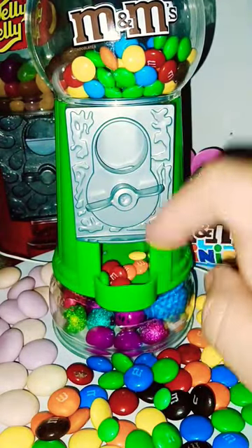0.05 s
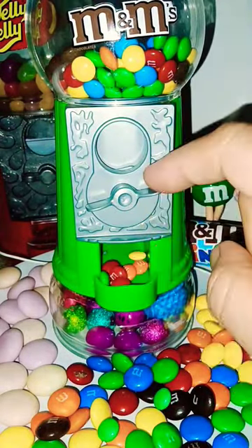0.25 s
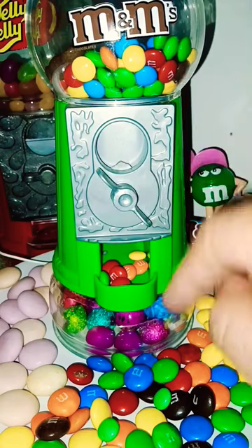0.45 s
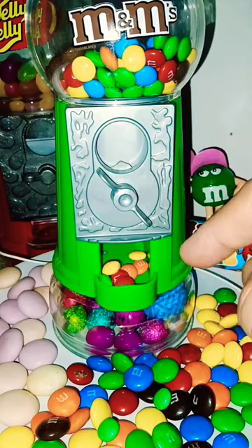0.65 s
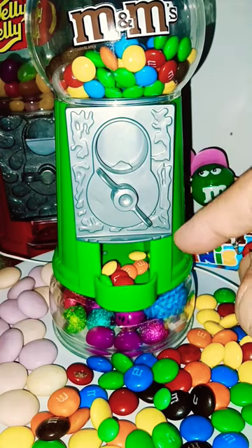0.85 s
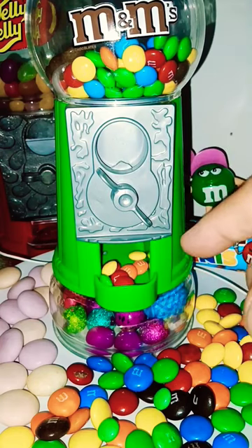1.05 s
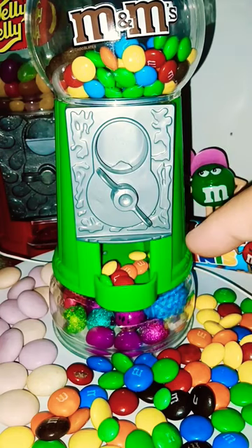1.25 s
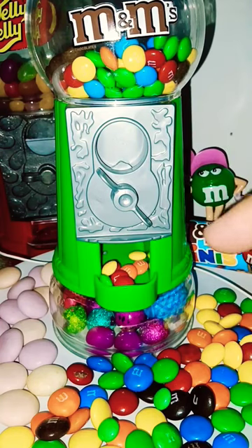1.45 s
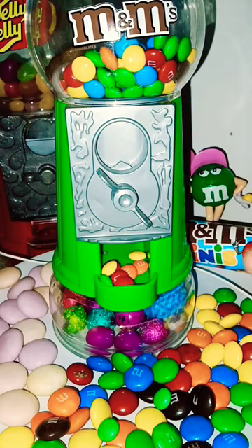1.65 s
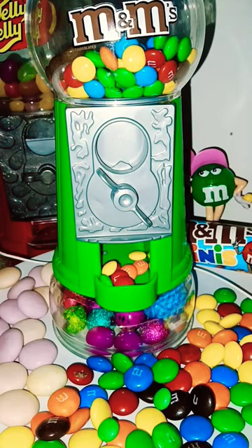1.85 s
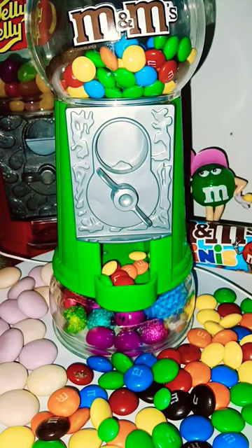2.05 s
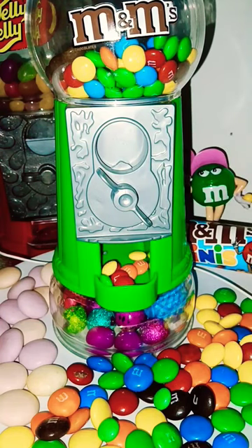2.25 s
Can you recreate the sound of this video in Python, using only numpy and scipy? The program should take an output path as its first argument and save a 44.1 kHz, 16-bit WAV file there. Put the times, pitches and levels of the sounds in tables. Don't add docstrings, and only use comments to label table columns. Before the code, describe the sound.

Hard plastic clicks and a quick rattle of candies from a dispenser, followed by faint hum and hiss.

```python
import sys
import numpy as np
from scipy import signal
from scipy.fft import rfft, irfft, next_fast_len
from scipy.io import wavfile
from scipy.ndimage import uniform_filter1d

SR = 44100
rng = np.random.default_rng(int(sys.argv[2]) if len(sys.argv) > 2 else 0)


def generate_wav(signal):
    frames = np.transpose(np.atleast_2d(signal))
    scaled = np.clip(frames, -1, 1) * 32767
    pcm = np.round(scaled).astype(np.int16)
    wavfile.write(sys.argv[1], SR, pcm)


def ratio(d):
    e = np.asarray(d, float) / 20
    return 10 ** e


N = 101429
T = np.arange(N) / SR
RIGHT_LAG = int(0.0001 * SR)
ALIKE_BELOW_HZ = 2500

# (frequency [Hz], level [dB], t60 [s])
KNOB_MODES = [(717.6, -7, 0.017), (970, -3.5, 0.0119), (1860, -7, 0.014), (2950, -1, .008),
              (3917, -3.5, .007), (5340, -5, .008), (6330, -11.5, .007), (7600, -14, .007),
              (8700, -13.5, 0.008), (9350, -14.5, .008), (11100, -21.5, 0.0092)]
# (frequency [Hz], level [dB], t60 [s])
GATE_MODES = [(1470, -15.5, 0.036), (1930, -8.5, .011), (3000, -23.5, .008), (4360, -8.5, 0.0071),
              (5780, -2.5, .009), (5980, -5.5, .012), (7300, -13.5, .008), (7580, -5.5, .012),
              (8620, -4.5, 0.0069), (9520, -6.5, .012), (10600, -16.5, .007), (11730, -17.5, .01),
              (13700, -8, 0.012), (14600, -19.5, 0.012)]
# (frequency [Hz], level [dB])
CRACK_SPECTRUM = [(400, -41), (800, -24), (1900, 5), (2600, -6), (5000, -7), (8000, -10), (10000, -18.5),
                  (12000, -25), (16000, -28)]


def unit(x):
    return x / np.sqrt(np.mean(x ** 2))


def on_log(table, hz):
    rows = np.array(table, float)
    return np.interp(np.log(np.maximum(hz, 1)), np.log(rows[:, 0]), rows[:, 1])


def curve(table):
    return ratio(np.interp(T, *np.array(table).T))


def colour(x, gain):
    n = x.shape[-1]
    return irfft(rfft(x) * gain(np.fft.rfftfreq(n, 1 / SR)), n)


def walk(rate_hz):
    width = int(SR / rate_hz)
    once = uniform_filter1d(rng.standard_normal(N), width)
    return unit(uniform_filter1d(once, width))


def pair(noises, gain):
    mid = colour(noises[0], gain)
    side = colour(noises[1], lambda f: gain(f) * np.minimum(f / ALIKE_BELOW_HZ, 1))
    return np.array([mid + side, mid - side])


def crack_gain(tilt_db):
    return lambda f: ratio(on_log(CRACK_SPECTRUM, f) + tilt_db * np.log2((f + 50) / 4000))


def ring(push, modes, tilt_db, longest_s=0.013):
    out = np.zeros((2, len(push)))
    for (hz, db, t60), luck in zip(modes, rng.standard_normal((len(modes), 2))):
        t60 = min(t60, longest_s)
        pole = np.exp(2j * np.pi * hz / SR - np.log(1000) / (t60 * SR))
        z = signal.lfilter([1], [1, -pole], push)
        level = ratio(db + tilt_db * np.log2(hz / 4000))
        z = z * level / np.sqrt(t60 * np.sum(np.abs(z) ** 2))
        quarter = np.sign(luck[0]) * np.pi / 2 + 0.25 * luck[1]
        undo_lag = 2 * np.pi * hz * RIGHT_LAG / SR
        turn = (quarter + undo_lag) * min((hz / ALIKE_BELOW_HZ) ** 2, 1)
        out += [z.imag, (z * np.exp(1j * turn)).imag]
    return out


def hits(table, modes):
    first_contact_db, crack_db = 13, -14
    out = np.zeros((2, N))
    t = T[:4096]
    first = ratio(first_contact_db) * (np.arange(len(t)) == 8)
    for s, db, length, tilt_db in table:
        shape = np.clip(t / 0.00035, 0, 1) * np.exp(-(t / length) ** 2.5)
        chatter = rng.standard_normal(len(t)) * shape ** 2
        body = ring(first + chatter, modes, tilt_db)
        crack = shape * pair(rng.standard_normal((2, len(t))), crack_gain(tilt_db))
        hit = body / np.abs(body).max() + ratio(crack_db) * crack / np.abs(crack).max()
        i = int(s * SR)
        out[:, i:i + len(t)] += ratio(db) * hit
    return out


def slide(table, modes, grit_db, bright_db):
    taps_per_s, spread_db = 5000, 1.5
    n = SR * 6 // 10
    struck = rng.random(n) < taps_per_s / SR
    taps = struck * ratio(spread_db * rng.exponential(size=n)) * rng.choice([-1, 1], n)
    grit = pair(taps * rng.standard_normal((2, n)), crack_gain(bright_db))
    body = ring(taps, modes, 0, longest_s=0.007)
    rubbing = unit(body) + ratio(grit_db) * unit(grit)
    return curve(table) * np.pad(rubbing, ((0, 0), (0, N - n)))


def background():
    # (frequency [Hz], level [dB])
    floor = [(20, 3), (32, 0), (52, -7.5), (100, -10.5), (150, -11.5), (350, -16.5), (800, -23.5),
             (5000, -33), (16300, -37.5)]
    # (frequency [Hz], correlation)
    likeness = [(25, 0.13), (60, 0.55), (150, 0.04), (1000, 0.03), (2500, 0.67), (12000, 0)]
    mains = [-74.5, -63.5, -73.5, -67.5, -81, -82, -84.5, -89.5, -82.5]
    # (frequency [Hz], level [dB])
    fan = [(219.7, -77), (258.3, -76)]
    # (frequency [Hz], level [dB])
    whine = [(6401, -100), (7197, -93), (7402, -95), (7601, -99), (8000, -99), (13049, -98)]
    mains_hz, floor_db, floor_pan_db = 99.96, -59.5, 4

    def like(f):
        return np.clip(on_log(likeness, f), 0, 1)

    mid = colour(rng.standard_normal(N), lambda f: ratio(on_log(floor, f)) * np.sqrt(1 + like(f)))
    side = colour(rng.standard_normal(N), lambda f: ratio(on_log(floor, f)) * np.sqrt(1 - like(f)))
    air = unit(np.array([mid + side, mid - side])) * ratio(floor_db + 0.5 * walk(3))
    air = air * ratio(np.array([[0.5], [-0.5]]) * floor_pan_db)

    harmonics = [(k * mains_hz, db) for k, db in enumerate(mains, 1)]
    late = np.array([[0], [0.0003]])  # s, left and right
    hum = 0
    for hz, db in [*harmonics, *fan, *whine]:
        level = np.sqrt(2) * ratio(db + 0.49 * walk(11))
        hum = hum + level * np.sin(2 * np.pi * (hz * (T - late) + rng.random()))
    return air + hum


def insect():
    # (time [s], level [dB])
    trills = [(1.225, -100), (1.24, -67), (1.252, -100), (1.47, -100), (1.52, -74.5), (1.65, -68.5),
              (1.76, -74.5), (1.86, -76.5), (1.9, -100)]
    trill_hz, width_hz, throb_per_s, throb_db = 3760, 240, 53, 3
    noise = rng.standard_normal((2, N))
    trill = colour(noise, lambda f: 1 / (1 + (2 * (f - trill_hz) / width_hz) ** 2))
    throb = ratio(throb_db * np.sin(2 * np.pi * throb_per_s * T + walk(9.1)))
    return unit(trill) * curve(trills) * throb


def shake():
    # (time [s], level [dB])
    shaking = [(.16, -94), (.2, -54), (.27, -52), (.33, -62), (.39, -58.5), (.45, -63.5), (.55, -54),
               (.65, -94)]
    shake_hz = 45
    rumble = colour(rng.standard_normal((2, N)), lambda f: f / (1 + (f / shake_hz) ** 3))
    return curve(shaking) * unit(rumble) * ratio(np.array([[2], [-2]]))


def thumps():
    # (time [s], left level [dB], right level [dB], frequency [Hz], t60 [s])
    jolts = [
        (0.3567, -41.5, -27.5, 420, .012),
        (0.3577, -29.5, -45, 130, .02),
        (0.3559, -42, -52.5, 140, 0.02),
    ]
    # (time [s], left level [dB], right level [dB], frequency [Hz], t60 [s])
    sway = [
        (0.364, -30, -38, 9, 0.3),
    ]
    out = 0
    for s, left_db, right_db, hz, t60 in [*jolts, *sway]:
        t = np.maximum(T - s, 0)
        jolt = np.sin(2 * np.pi * hz * t) * 1000 ** (-t / t60)
        out = out + ratio(np.array([[left_db], [right_db]])) * jolt
    return out


def room(x):
    # (frequency [Hz], t60 [s])
    decay = [(500, 0.29), (1500, 0.23), (3000, 0.22), (6000, 0.16), (9000, 0.17), (14000, 0.099)]
    room_db, late_db, late_stretch, top_hz = -13, -19.5, 2.3, 10300
    scatter_per_s, scatter_rad = 900, 1.3
    tail = 0
    for hz in 350 * 2 ** np.arange(0, 5.6, 0.5):
        noise = rng.standard_normal((2, N))
        band = pair(noise, lambda f: np.exp(-(np.log2((f + 1) / hz) / 0.66) ** 2))
        t60 = on_log(decay, hz)
        late = ratio(late_db) * 1000 ** (-T / t60 / late_stretch)
        tail = tail + band * (1000 ** (-T / t60) + late)
    tail = colour(tail, lambda f: 1 / np.sqrt(1 + (f / top_hz) ** 16))
    tail = tail * np.clip(T / 0.004, 0, 1)
    tail = tail / np.sqrt(np.sum(tail ** 2) / 2)
    analytic = signal.hilbert(x, next_fast_len(N))[:, :N]
    blurred = (analytic * np.exp(1j * scatter_rad * walk(scatter_per_s))).real
    return ratio(room_db) * signal.fftconvolve(blurred, tail, axes=1)[:, :N]


def ports(x):
    # (frequency [Hz], level [dB])
    port_difference = [(500, -10), (1400, 3.5), (2800, -1), (5600, 10), (7500, 13.5), (9200, -6.5),
                       (13000, -3.5)]
    # (frequency [Hz], level [dB])
    capsule = [(1000, -5), (9500, 8), (11500, 1), (16000, -4.5)]

    def port(v, side):
        return colour(v, lambda f: ratio(side * on_log(port_difference, f) / 2 + on_log(capsule, f)))

    return np.array([port(x[0], 1), np.roll(port(x[1], -1), RIGHT_LAG)])


def shell_settling():
    # (frequency [Hz], level [dB], t60 [s])
    shell_modes = [(5190, -4, .01), (7420, 0.1, 0.0061), (8300, -4, .01)]
    # (time [s], level [dB], chatter length [s], brightness [dB/octave])
    ticks = [
        (1.943, -61.5, 0.0013, 0.1),
        (2.103, -61.5, 0.0016, 0.1),
    ]
    return hits(ticks, shell_modes)


def cap_knocks():
    # (frequency [Hz], level [dB], t60 [s])
    cap_modes = [(1720, -6, 0.018), (1837, -0.5, 0.036), (4200, -21.5, .01)]
    # (time [s], level [dB], chatter length [s], brightness [dB/octave])
    knocks = [
        (.2078, -16.5, 0.006, 2),
        (.2195, -21, .003, -9.5),
    ]
    return hits(knocks, cap_modes)


def candy_taps():
    # (frequency [Hz], level [dB], t60 [s])
    candy_modes = [(1022, -29.5, .009), (1540, -13.5, .012), (1956, -11, .012), (2900, -22, 0.0084),
                   (4660, -2.5, .011), (5150, -15, .01), (5232, -8.5, 0.0086), (6150, -2, .01),
                   (7530, -5, .012), (8260, -14.5, .012), (9300, -14.5, .007), (10600, -13.5, 0.01113),
                   (11900, -17.5, .008), (13500, -25.5, .006)]
    # (time [s], level [dB], chatter length [s], brightness [dB/octave])
    candy_hits = [
        (.5096, -13, 0.005, -0.5),
        (.5215, -26.5, 0.0045, 1),
        (.5265, -34, .002, -23.5),
        (.5425, -52, 0.0029, -13.5),
    ]
    return hits(candy_hits, candy_modes)


def chute_taps():
    # (frequency [Hz], level [dB], t60 [s])
    chute_modes = [(1400, -10, .012), (1990, -9, .013), (3490, -2.5, 0.021), (4460, -4, .01),
                   (5630, -10, 0.0056), (6150, -9, 0.00913), (7540, -7.5, 0.0058), (9270, -7, .012),
                   (9700, -13, .008), (11900, -15, .012), (14600, -16.5, .01)]
    # (time [s], level [dB], chatter length [s], brightness [dB/octave])
    chute_hits = [
        (.3995, -32.5, .004, 2),
        (.4119, -15.5, 0.0055, -0.36),
        (.4185, -25, .003, -3.5),
        (.4226, -22, .003, -4.5),
        (.4285, -26, .003, -5.5),
        (.4413, -15.5, .0018, 2),
    ]
    return hits(chute_hits, chute_modes)


def candy_slide():
    # (time [s], level [dB])
    sliding = [(.357, -92.5), (.364, -41), (.385, -38), (.405, -41), (.43, -42), (.455, -54), (.5, -54.5),
               (.52, -75)]
    return slide(sliding, GATE_MODES, grit_db=0.84, bright_db=9)


def gate_knock():
    # (time [s], level [dB], chatter length [s], brightness [dB/octave])
    gate_hits = [
        (.3562, -5, 0.002, 0.1),
    ]
    return hits(gate_hits, GATE_MODES)


def detent_snap():
    # (frequency [Hz], level [dB], t60 [s])
    detent_modes = [(920, -26, .009), (1400, -21, 0.014), (1660, -8.5, .011), (1990, -2.5, 0.017),
                    (2961, -12.5, 0.014), (3860, -7, .011), (4730, -9, .012), (5970, -16.5, .006),
                    (7160, -10, 0.0099), (7785, -5.5, 0.011), (8500, -10, .007), (9530, -5, 0.01),
                    (11300, -24, .01), (13300, -16, .008)]
    # (time [s], level [dB], chatter length [s], brightness [dB/octave])
    snaps = [
        (.2762, -6.5, 0.0032, 0.1),
        (.281, -27, 0.0048, 0.1),
    ]
    return hits(snaps, detent_modes)


def finger_rub():
    # (time [s], level [dB])
    rubbing = [(.186, -89.5), (.197, -49.5), (.205, -39), (.215, -34), (.225, -35.5), (.24, -47.5),
               (.26, -71)]
    return slide(rubbing, KNOB_MODES, grit_db=-2, bright_db=0.1)


def knob_flick():
    # (time [s], level [dB], chatter length [s], brightness [dB/octave])
    clicks = [
        (.1973, -35, .002, 0),
        (.2038, -21.5, .002, 4.5),
        (.2193, -16.5, .0045, 5.5),
        (.2238, -16, .003, -7.5),
        (.2285, -27.5, .002, -7.5),
        (.233, -30.5, .002, -0.5),
    ]
    return hits(clicks, KNOB_MODES)


def scene():
    near = knob_flick() + detent_snap() + gate_knock() + chute_taps() + candy_taps()
    near = near + shell_settling() + cap_knocks() + finger_rub() + candy_slide()
    thin = signal.butter(3, 770.2, "high", fs=SR, output="sos")
    near = ports(signal.sosfilt(thin, near))
    return near + room(near) + thumps() + shake() + background() + insect()


def low_pass(x):
    return signal.sosfilt(signal.butter(12, 16470, fs=SR, output="sos"), x)


def record(dry):
    ceiling, top_hz, cut_hz = 0.95, 15500, 16340

    def edge(f):
        shelf_db = np.interp(f, [top_hz - 300, top_hz + 300], [0, -7])
        return ratio(shelf_db) * (f < cut_hz)

    limited = ceiling * np.tanh(dry / ceiling)
    return low_pass(colour(limited, edge))


dry = scene()
out = record(dry)
generate_wav(out)
```